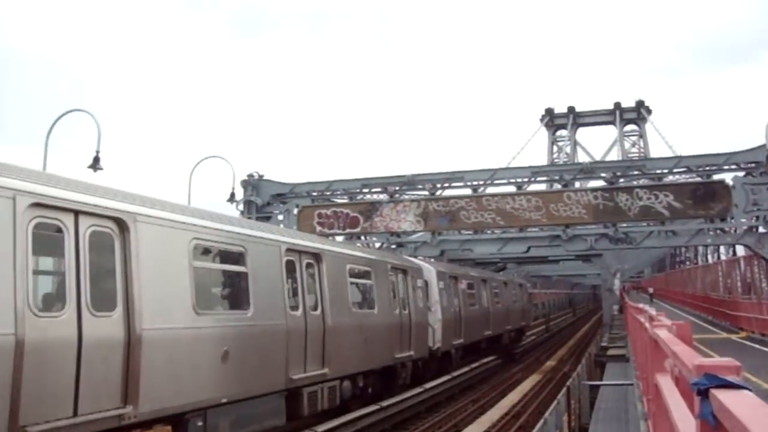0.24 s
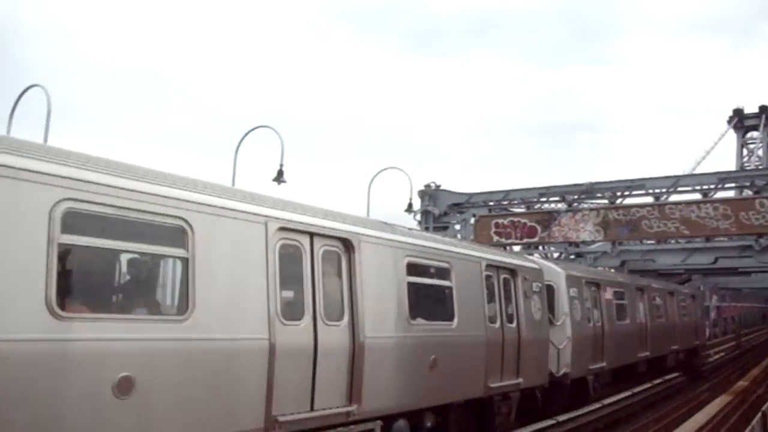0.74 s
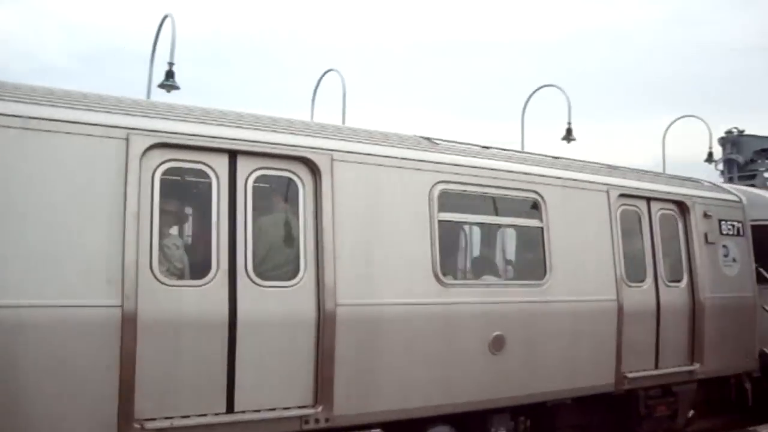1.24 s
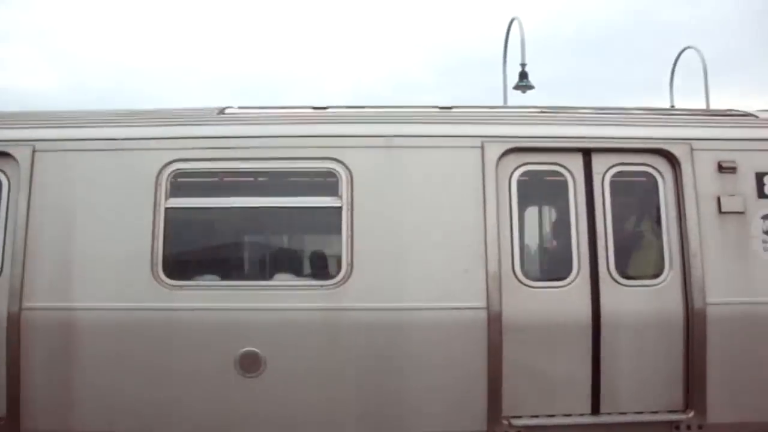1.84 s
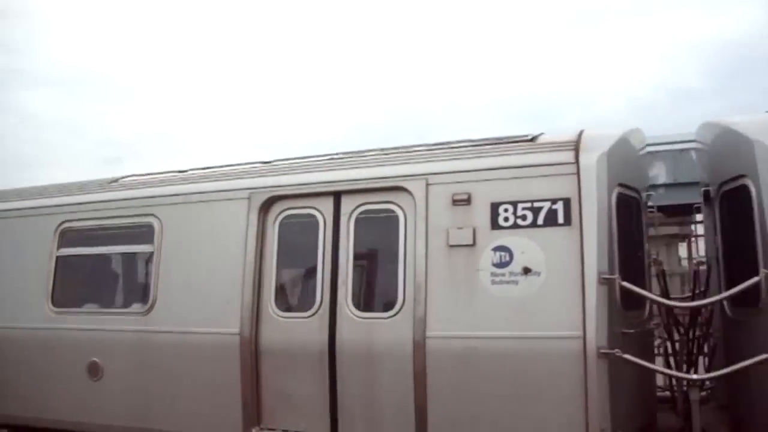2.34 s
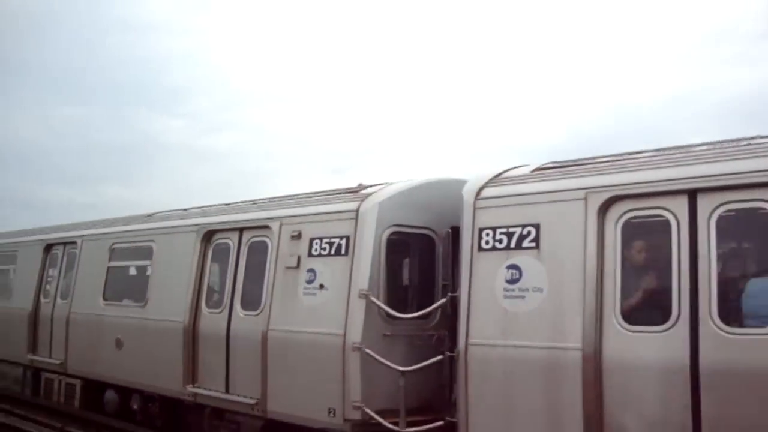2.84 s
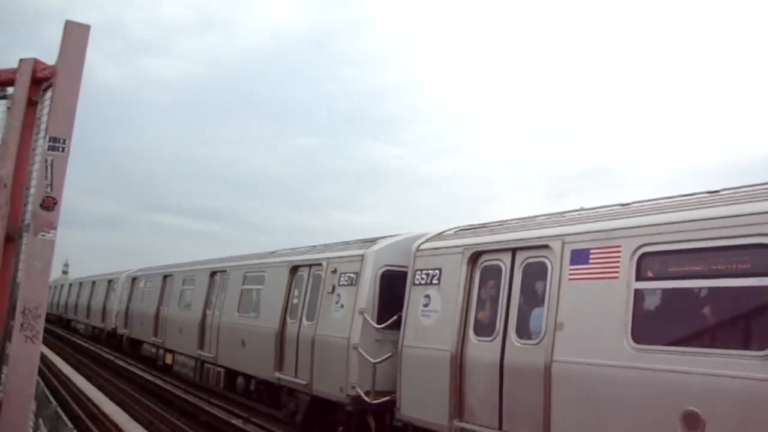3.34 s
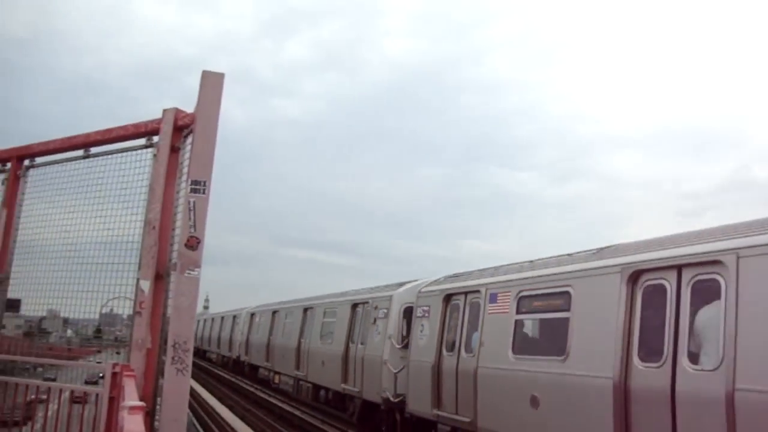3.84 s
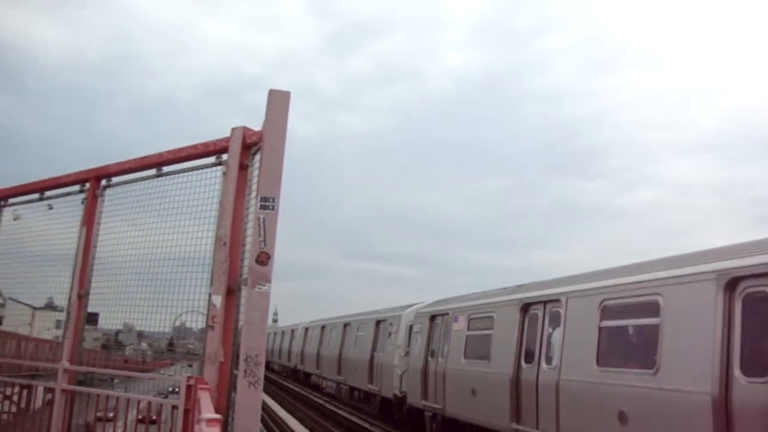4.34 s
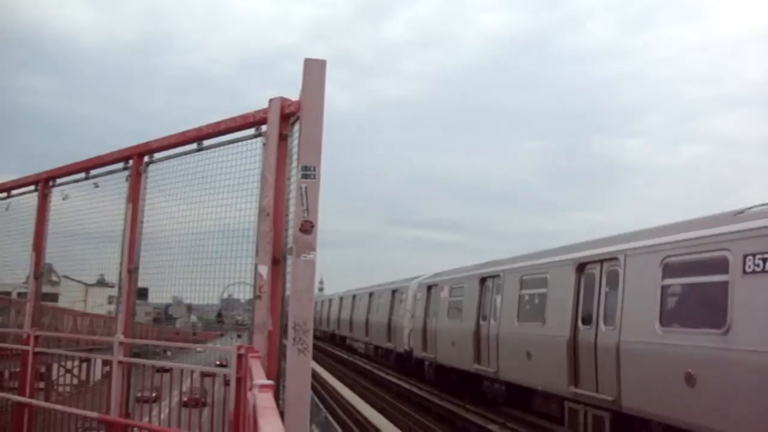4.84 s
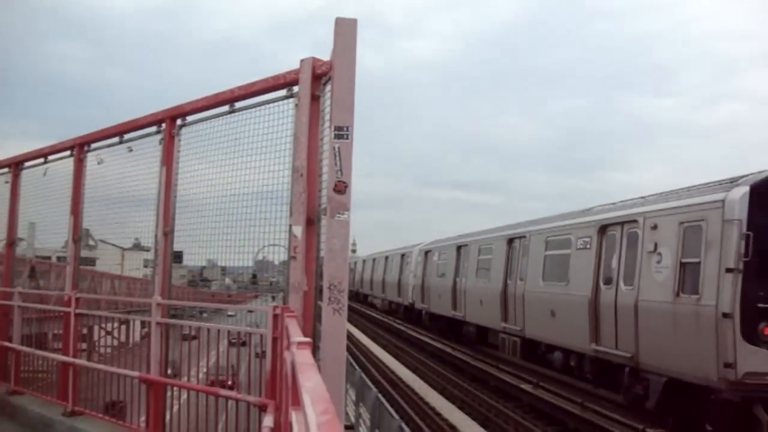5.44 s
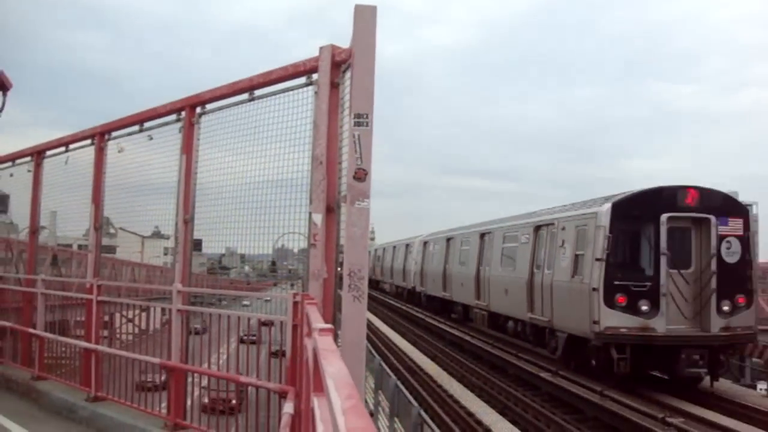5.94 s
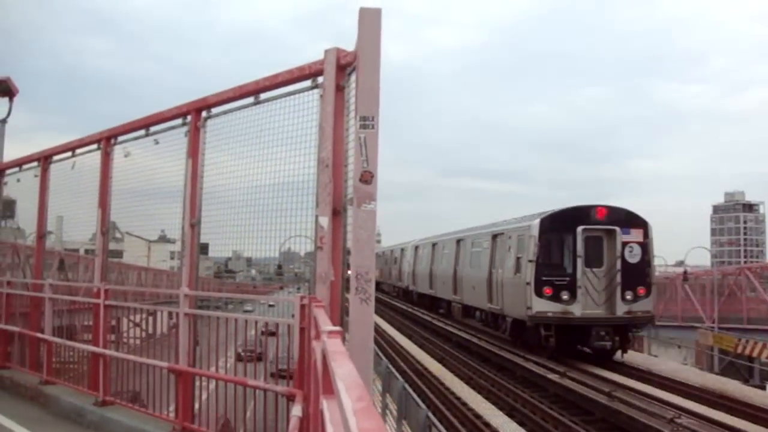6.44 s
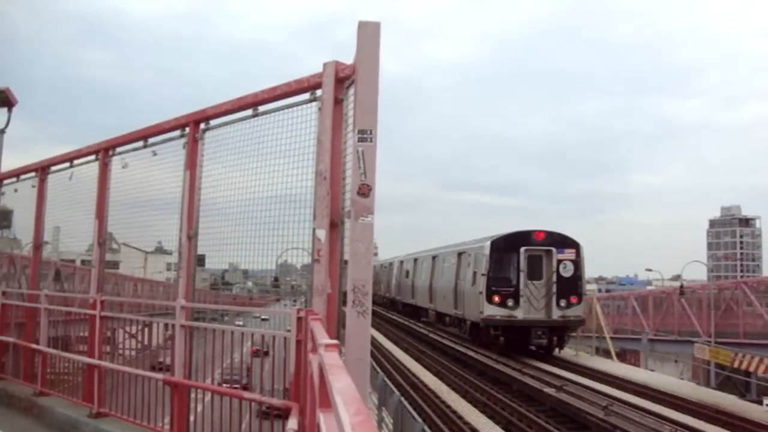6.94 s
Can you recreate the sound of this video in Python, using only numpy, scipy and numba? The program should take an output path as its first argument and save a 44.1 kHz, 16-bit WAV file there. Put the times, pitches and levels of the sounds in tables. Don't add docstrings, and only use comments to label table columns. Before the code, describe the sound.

A steel train roars past close by on an open metal bridge, wheels crashing over rail joints, with brief squeals and ringing plates.

```python
import sys
import numpy as np
from scipy import signal
from scipy.fft import rfft, irfft
from scipy.io import wavfile
from scipy.ndimage import uniform_filter1d
from numba import njit

SR = 44100
rng = np.random.default_rng(int(sys.argv[2]) if len(sys.argv) > 2 else 0)


def nominal_scale(level):
    x = np.asarray(level, float) / 20
    return 10 ** x


def inscribe(sig):
    pcm = np.round(np.clip(np.atleast_2d(sig).T, -1, 1) * 32767)
    wavfile.write(sys.argv[1], SR, pcm.astype(np.int16))


N = 316631
TIME = np.arange(N) / SR
FREQ = np.fft.rfftfreq(N, 1 / SR)


def level(x):
    return x / np.sqrt(np.mean(x ** 2))


def colour(x, points, lo_hz, hi_hz, order=3):
    hz, db = np.transpose(points)
    f = FREQ + 1
    low_skirt = 1 + (lo_hz / f) ** (2 * order)
    high_skirt = 1 + (f / hi_hz) ** (2 * order)
    tint = nominal_scale(np.interp(np.log(f), np.log(hz), db))
    return level(irfft(rfft(x) * tint / np.sqrt(low_skirt * high_skirt), N))


def walk(rate):
    k = int(SR / rate)
    steps = np.repeat(rng.standard_normal(N // k + 1), k)
    return 1.02 * uniform_filter1d(uniform_filter1d(steps, k), k)[:N]


def grit(spread_db):
    return rng.standard_normal(N) * nominal_scale(spread_db * walk(900))


def swell(rise, t60, count):
    t = np.arange(count) / SR
    shape = (1 - np.exp(-t / max(rise, 1 / SR))) * 1000 ** (-t / max(t60, 100 / SR))
    return shape / shape.max()


def hold(rise, t60, count):
    t = np.arange(count) / SR
    return (1 - np.exp(-t / max(rise, 1 / SR))) * 1000 ** (-(t / t60) ** 3)


# (time [s], rolling load [dB], closeness of the wheels [dB], rail resonance [Hz])
PASSING = [(0.0, -15.5, 0, 794), (0.92, -15.5, -1.5, 797), (0.98, -14.5, 1.5, 807),
           (1.58, -20.5, -0.5, 800), (2.34, -18, 0.5, 817), (2.72, -18, 0, 757), (3.22, -17.5, -2.5, 810),
           (3.32, -15, -7, 730), (3.46, -18, 3.5, 776), (3.88, -18.5, -2, 776), (4.28, -15, -1, 831),
           (5.4, -18.5, 0, 763), (5.48, -17.5, -1.5, 846), (6.06, -13, 2, 784), (6.16, -16, 0.5, 845),
           (6.24, -14, -1.5, 738), (6.32, -15, 0, 854), (7.18, -13, -1, 799)]
MEAN_LOAD_DB = -18


def train():
    s, load_db, close_db, hz = np.transpose(PASSING)
    return [np.interp(TIME, s, c) for c in (load_db - MEAN_LOAD_DB, close_db, hz)]


# (frequency [Hz], level [dB per Hz])
ROLL_TINT = [(15, -59), (25, -37), (86, -25), (188, -7.5), (335, -4), (420, -4.5), (629, 0), (789, 0),
             (1370, -0.5), (2220, -5), (5350, -10.5), (8420, -20.5), (9550, -25.5), (10300, -20),
             (13400, -59), (22000, -120)]
PART_EDGES_HZ = (450, 1600, 4500)
PART_LEVEL_DB = [
    -26,
    -19.5,
    -24.5,
    -30,
]
LOAD_SHARE = (0.61, 0.77, 0.34, .3)
CLOSE_SHARE = (.2, .01, .6, 1.01)
FADE_DB_PER_S = (-0.29, 0.044, -0.3, -.8)


def rolling(wander_db=1.21, grit_db=3.5):
    load_db, close_db, _ = train()
    edges = (1, *PART_EDGES_HZ, SR)
    out = 0
    for k, db in enumerate(PART_LEVEL_DB):
        body = colour(grit(grit_db * k / len(PART_LEVEL_DB)), ROLL_TINT, edges[k], edges[k + 1])
        db = db + LOAD_SHARE[k] * load_db + CLOSE_SHARE[k] * close_db + FADE_DB_PER_S[k] * TIME
        out = out + body * nominal_scale(db + wander_db * walk(12))
    return out


# (frequency [Hz], level [dB], t60 [s])
WHEEL_MODES = [(1900, 4, 0.17), (2480, -8.5, 0.14), (2570, -1, .25), (2715, 1.5, .2), (3370, -3.5, 0.27),
               (3940, -15, 0.19), (4430, 1.5, .3), (5250, -10.5, 0.4), (5980, -17, 0.21), (7040, -2, 0.29),
               (7330, -13.5, .3), (8100, -13.5, .3), (8470, -11, 0.36)]


def wheel_rings(chance, count, scatter_db=12, detune=0.024):
    hz, db, t60 = np.transpose(WHEEL_MODES)[:, :, None]
    pitch, size, phase = chance[:, :, None]
    t = TIME[:count]
    tones = np.sin(2 * np.pi * (hz * (1 + detune * (pitch - .5)) * t + phase))
    return np.sum(nominal_scale(db - scatter_db * size) * tones * 1000 ** (-t / t60), axis=0)


# (time [s], crash level [dB], sizzle relative to crash [dB], thud relative to crash [dB])
NEAR_JOINTS = [(0.521, -18.5, -32, 12), (0.6494, -24.5, 1.5, -12), (0.8886, -12.5, -14, -7),
               (1.0024, -22.5, -29, 18), (1.108, -11, -4, -4), (1.37, -9, -10, 1), (1.7387, -7, -11.5, -7),
               (1.878, -16, -8, 6), (2.0133, -10.5, -23, -6), (2.152, -12, -17, 6), (2.2186, -18.5, -7, -2),
               (2.654, -13, -10, 6), (2.7694, -14.5, -16, 7), (2.9196, -12, -13, 1), (3.272, -8.5, -15, 4),
               (3.486, -11.5, -19, 7.5), (3.539, -17.5, -9, -3), (3.752, -12, -15, 6.5),
               (4.2358, -18, -14, 9), (4.7894, -15, -26, 8), (4.988, -9, -23, 8.5), (5.02, -19, -8, -3),
               (5.2423, -8.5, -20, 4.5), (5.75, -10.5, -19, 2), (5.998, -28, -7, -6),
               (6.023, -9.5, -35, -2), (6.363, -19, -15, 12), (6.51, -22, -13, -9), (6.5606, -14.5, -13, 5),
               (6.848, -12, -16, 2)]
# (time [s], crash level [dB], sizzle relative to crash [dB], thud relative to crash [dB])
DISTANT_JOINTS = [(0.1098, -13, -8.5, -4), (0.388, -12, -10.5, -16), (1.908, -16, -4.5, 4),
                  (2.506, -14.5, -8.5, 10.5), (2.5414, -16, -9, -3.5), (2.809, -18, -6, 3),
                  (3.4194, -24, -22, 4), (4.0194, -16.5, -18, -2), (4.1896, -20, -22, 4),
                  (4.2694, -13.5, -10, -3), (4.4947, -15, -19, 5)]
# (frequency [Hz], level [dB per Hz])
CRASH_TINT = [(88, -46), (150, -5.5), (279, -3), (586, 5), (792, 5.5), (1580, -5.5), (1990, -7), (3690, -9),
              (6740, -11.5), (10300, -18.5), (13400, -49), (22000, -120)]
NEAR_RISE_S, FAR_RISE_S = 0.0032, .021
CRASH_T60_S, CRASH_SHORTER_PER_S = 0.62, 0.045


def joints(crash_db=-9, sizzle_db=-0.5, thud_db=-3, thud_slow=1.04, sizzle_slow=0.93, ring_db=-8,
           crack=.6, crack_t60=0.018):
    clatter = grit(0.75)
    crash = colour(clatter, CRASH_TINT, 1750, 4200)
    sizzle = colour(clatter, CRASH_TINT, 6000, SR)
    thud = colour(grit(1.4), CRASH_TINT, 0.88, 1600)
    axles = [(*row, NEAR_RISE_S) for row in NEAR_JOINTS]
    axles += [(*row, FAR_RISE_S) for row in DISTANT_JOINTS]
    chance = rng.random((len(axles), 3, len(WHEEL_MODES)))
    out = np.zeros(N)
    for (s, db, top_db, low_db, rise), blow in zip(axles, chance):
        t60 = CRASH_T60_S - CRASH_SHORTER_PER_S * s
        start = int(s * SR)
        on = slice(start, min(N, start + SR // 2))
        n = on.stop - on.start
        first = 1 + crack * 1000 ** (-TIME[:n] / crack_t60)
        burst = crash[on] * swell(rise, t60, n) * first
        burst += nominal_scale(ring_db) * wheel_rings(blow, n) * swell(rise, 2, n)
        burst += nominal_scale(top_db + sizzle_db) * sizzle[on] * swell(rise, sizzle_slow * t60, n) * first
        burst += nominal_scale(low_db + thud_db) * thud[on] * swell(thud_slow * rise, thud_slow * t60, n) * first
        out[on] += nominal_scale(db + crash_db) * burst
    return out


# (time [s], level [dB], centre [Hz])
HARD_KNOCKS = [
    (1.742, -25, 3000),
    (2.923, -15, 2500),
    (3.277, -19, 3500),
    (3.488, -21, 3000),
    (3.755, -19, 1500),
    (4.99, -21, 3000),
    (5.248, -20, 3500),
    (6.001, -25, 4500),
    (6.026, -21, 3500),
    (6.364, -21, 5200),
]
KNOCK_CYCLES_RISE, KNOCK_CYCLES_T60, KNOCK_WIDTH = 7, 250, 1.42


def knocks():
    out, contact = np.zeros(N), grit(3.7)
    tint = [(20, 0), (1000, 0), (20000, -40)]  # (Hz, dB)
    for s, db, hz in HARD_KNOCKS:
        blow = colour(contact, tint, hz / KNOCK_WIDTH, hz * KNOCK_WIDTH)
        start = int(s * SR)
        shape = swell(KNOCK_CYCLES_RISE / hz, KNOCK_CYCLES_T60 / hz, N - start)
        out[start:] += nominal_scale(db) * blow[start:] * shape
    return out


# (time [s], mode [Hz], level [dB], t60 [s])
PLATES = [(.08, 360, -25, .9), (.2, 756, -20.5, 1.2), (.24, 503, -18, 0.35), (.54, 760, -22, 1.2),
          (.72, 890, -21, 0.86), (.93, 302, -26.5, 0.58), (.93, 726, -23, 1.8), (1.9, 342, -23.5, 0.56),
          (2.5, 744, -25, .99), (2.74, 735, -22, .7), (1.742, 2900, -19.5, 0.32), (2.05, 950, -24, 1.6),
          (2.9, 588, -28.5, 2.8), (3.27, 616, -21, 0.73), (3.48, 880, -22, .6), (3.752, 816, -14, 0.19),
          (3.85, 563, -35, 3.7), (4.14, 1070, -15, 0.75), (4.23, 372, -19.5, .5), (4.5, 344, -21.5, .47),
          (5.0, 376, -23, 0.58), (5.248, 3100, -18, 0.16), (5.72, 824, -20.5, 1.4), (5.9, 687, -26.5, 1.7),
          (6.15, 640, -29, 2), (6.3, 920, -19, .8), (6.55, 640, -27.5, 4.1), (6.65, 920, -25, 1.2),
          (6.82, 1240, -20, 0.98), (7.0, 600, -23.5, 3.8)]
PLATE_WIDTH, PLATE_NARROWS = 0.13, 1
PLATE_RISE_S, PLATE_SLOWS, PLATE_LONGEST_RISE_S = 0.022, 1.1, 0.069


def girders():
    out, rough = np.zeros(N), rfft(rng.standard_normal(N))
    for s, hz, db, t60 in PLATES:
        width = PLATE_WIDTH * hz / t60 ** PLATE_NARROWS
        rise = min(PLATE_RISE_S * t60 ** PLATE_SLOWS, PLATE_LONGEST_RISE_S)
        peak = 1 / (1 + ((FREQ - hz) / (0.78 * width)) ** 2)
        boom = level(irfft(rough * np.minimum(FREQ / hz, 1) ** 2 * peak, N))
        start = int(s * SR)
        out[start:] += nominal_scale(db) * boom[start:] * swell(rise, t60, N - start)
    return out


# (time [s], mode [Hz], level [dB], length [s])
WHEEL_SONGS = [(.36, 6800, -41, 0.53), (.38, 8470, -46, .6), (.62, 9550, -52, .5), (.68, 3940, -45, 1.0),
               (.88, 1900, -28, 0.18), (1.12, 8480, -43, 0.4), (1.15, 4430, -40, 0.58),
               (1.39, 8400, -46, 0.45), (1.44, 4430, -39, .5), (1.76, 3530, -37, .6), (1.74, 6780, -40, .4),
               (1.9, 8120, -41, .53), (2.0, 8500, -48, 0.44), (2.36, 8113, -48, .6), (2.78, 5250, -42, .7),
               (3.1, 3870, -38, .71), (3.26, 8400, -53, .8), (3.82, 5300, -49, .6), (4.8, 2370, -40, .8),
               (4.71, 4400, -42, 0.44), (4.71, 8100, -50, .6), (4.72, 5980, -48, 1.0), (5.0, 8030, -49, .6),
               (5.45, 3880, -42, .8), (5.76, 2800, -35, .25), (6.03, 1900, -33, 0.24)]
# (time [s], mode [Hz], level [dB], length [s])
FLANGE_SQUEALS = [(2.19, 3390, -33.5, 1.0), (2.2, 4452, -44, 2.0), (2.58, 3390, -39, 1.0),
                  (2.85, 3400, -41, .8), (4.76, 2500, -41, 1.9), (5.3, 2519, -41, 2.6),
                  (5.4, 2358, -43, 3.0), (5.35, 7330, -55, 4.0), (3.8, 553, -34, 1.6),
                  (5.85, 2420, -43, 2.2), (6.05, 642, -31, 3.2)]
SONG_WIDTH_HZ, SQUEAL_WIDTH_HZ, SONG_RISE_SHARE = 150, 22, 0.032


def wheels(flutter_db=3.6):
    out, slip = np.zeros(N), nominal_scale(flutter_db * walk(40))
    for table, width in ((FLANGE_SQUEALS, SQUEAL_WIDTH_HZ), (WHEEL_SONGS, SONG_WIDTH_HZ)):
        for s, hz, db, length in table:
            start = int(s * SR)
            n = min(N - start, 2 * SR)
            wander = np.cumsum(rng.standard_normal(2 * SR)) * np.sqrt(2 * np.pi * width / SR)
            line = np.sin(2 * np.pi * hz * TIME[:n] + uniform_filter1d(wander, size=30)[:n])
            line *= np.roll(slip, rng.integers(N))[:n]
            shape = hold(SONG_RISE_SHARE * length / 2, length / 2, n)
            out[start:start + n] += nominal_scale(db + 10) * line * shape
    return out


@njit
def resonance(x, hz, width_hz):
    y, b, l = np.empty(len(x)), 0., 0.
    for i in range(len(x)):
        g, k = np.tan(np.pi * hz[i] / SR), width_hz / hz[i]
        v = (b + g * (x[i] - l)) / (1 + g * (g + k))
        b, l, y[i] = 2 * v - b, l + 2 * g * v, k * v
    return y


def rail_ring(width_hz=450.0, ring_db=-27, load_share=0.79):
    load_db, _, hz = train()
    once = resonance(rng.standard_normal(N), hz, width_hz)
    twice = resonance(once, hz, width_hz)
    return level(twice) * nominal_scale(ring_db + load_share * load_db)


def scene():
    mix = rolling() + joints() + knocks() + girders() + wheels() + rail_ring()
    return mix[None, :]


def low_pass(x):
    return signal.sosfilt(signal.butter(12, 11290, fs=SR, output="sos"), x)


# (time [s], length [s], lost above [Hz])
TREBLE_GAPS = [(0.625, .012, 8600), (1.091, 0.011, 6000), (1.36, .012, 7700), (1.706, .032, 9300),
               (1.722, 0.013, 7800), (2.9, .018, 8700), (3.26, 0.015, 4900), (3.462, .026, 9500),
               (3.474, 0.014, 8060), (3.733, 0.0098, 8000), (5.241, 0.0071, 4470), (6.501, .012, 7000),
               (6.825, .016, 9200)]
TOP_HZ = 9995
PATCH_SHARE, PATCH_FROM_HZ, LEAK = .02, 5200, .06


def record(dry):
    soft = 1.4 * np.tanh(dry[0] / 1.4)
    top_cut = 1 / (1 + (FREQ / TOP_HZ) ** 160) + .008 * (FREQ < 10800)
    cut = irfft(rfft(soft) * top_cut, N)
    hz, t, cells = signal.stft(cut, SR, nperseg=256)
    chance = rng.random((len(hz) // 4 + 1, len(t) // 4 + 1))
    chance = np.kron(chance, np.ones((4, 4)))[:len(hz), :len(t)]
    lost = (chance < PATCH_SHARE) & (hz[:, None] > PATCH_FROM_HZ)
    for s, length, above_hz in TREBLE_GAPS:
        lost |= (hz[:, None] > above_hz) & (t > s) & (t < s + length) & (chance > LEAK)
    out = signal.istft(cells * ~lost, SR, nperseg=256)[1][:N]
    faded_in = out * np.minimum(TIME / 0.0015, 1)
    return low_pass(np.clip(faded_in, -1, 1)[None, :])


dry = scene()
out = record(dry)
inscribe(out)
```